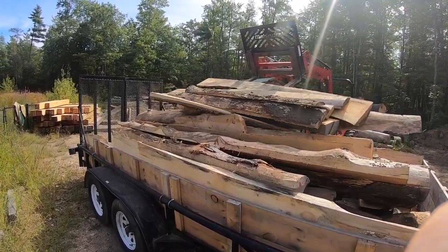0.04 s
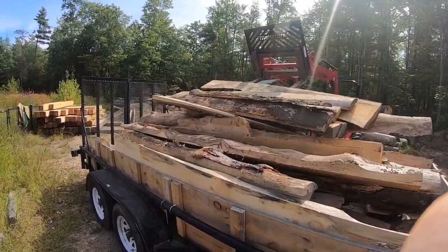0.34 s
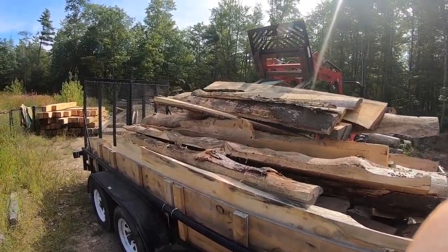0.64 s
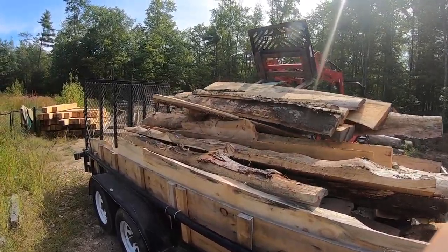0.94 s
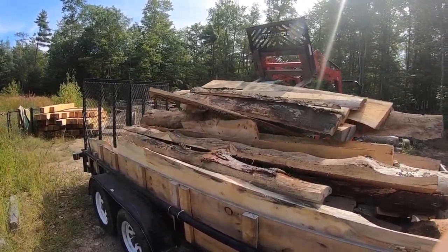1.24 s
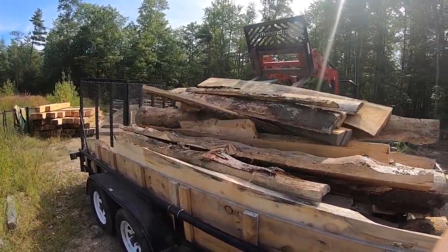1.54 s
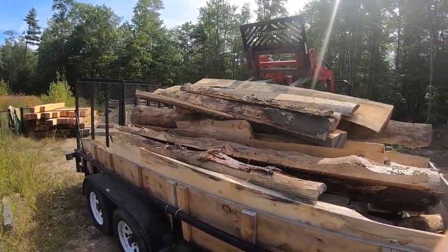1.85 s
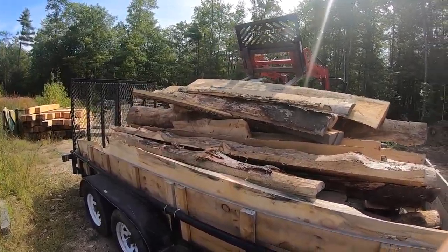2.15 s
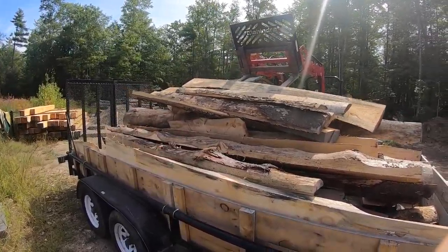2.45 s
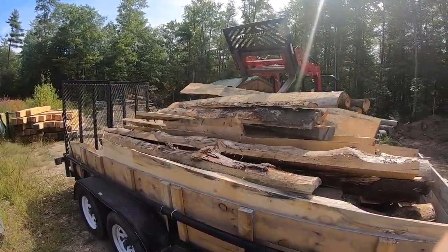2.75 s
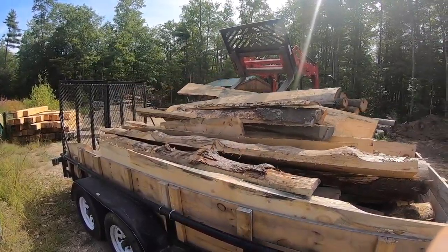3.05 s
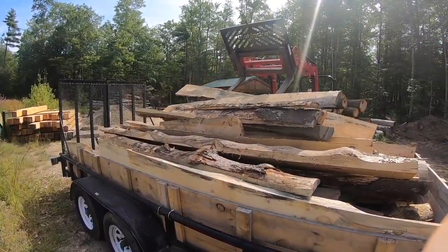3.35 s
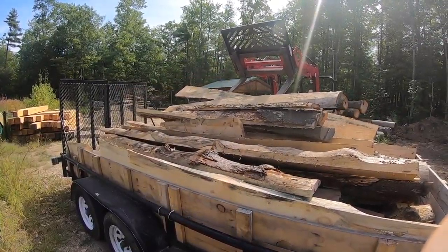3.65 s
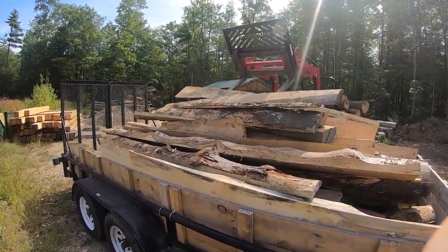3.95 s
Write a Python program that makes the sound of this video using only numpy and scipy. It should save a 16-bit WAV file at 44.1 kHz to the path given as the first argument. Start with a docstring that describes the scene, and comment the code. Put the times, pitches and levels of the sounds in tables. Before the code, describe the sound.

Wood slabs crack and shift over a diesel tractor's steady throb, outdoors a few metres away. Sharp snaps, crumbling bark and light clacks cluster from about 1.1 to 1.8 seconds. Two more cracks come near 2.6 seconds, then the slabs land with a loud hollow knock at 2.75 and settle. From 3.1 seconds the forks scrape softly in short slips, with a faint hydraulic whine at the end. Insects chirp faintly.

```python
"""A bundle of wood slabs is eased onto a trailer load by the forks of a three-cylinder diesel tractor.
Fibres snap and bark crumbles as the weight shifts; then the bundle drops with a hollow knock and
settles, and the forks scrape back. Behind the trailer, the engine's firings throb in the exhaust and
rattle the block. Outdoors, a few metres away, with faint insects and a faint echo from the trees."""
import sys
import numpy as np
from scipy import signal
from scipy.fft import rfft, irfft
from scipy.io import wavfile
from scipy.ndimage import map_coordinates

SR = 44100
rng = np.random.default_rng(int(sys.argv[2]) if len(sys.argv) > 2 else 0)


def master(y):
    """Save y as 16-bit WAV."""
    cut = np.clip(np.atleast_2d(y).T, -1, 1)
    pcm = np.round(cut * 32767)  # scale
    wavfile.write(sys.argv[1], SR, pcm.astype(np.int16))


N = 176400
T, HZ = np.arange(N) / SR, np.arange(N // 2 + 1) * SR / N
CYLINDERS = 3

# how often the engine fires: t/s, rate/Hz
FIRING_RATE = [(0.0, 41.14), (0.25, 41.65), (0.55, 42.25), (0.8, 41.19), (1.0, 40.83), (1.35, 40.85),
               (1.6, 41.08), (1.9, 41.94), (2.15, 42.3), (2.45, 42.07), (2.8, 42.37), (3.1, 42.27),
               (3.45, 42.15), (3.75, 41.36), (4.0, 39.71)]
# how alike the two ears hear clatter, bark and scrapes: f/Hz, likeness (0 to 1)
NOISE_LIKENESS = [(250, 0.99), (560, 0.97), (1200, 0.24), (2500, 0.66), (5200, 0.15), (11000, 0.087)]
# the same for snaps and thuds: f/Hz, likeness (0 to 1)
IMPACT_LIKENESS = [(300, .99), (1000, 0.85), (4000, 0.79), (12000, 0.47)]


def undb(db):
    """Turn decibels into a gain."""
    return 10 ** (np.asarray(db) / 20)


def unit(x):
    """Scale a sound to an average (rms) level of 1."""
    return x / np.sqrt(np.mean(x ** 2))


def pan(db):
    """Gains for two ears, the left one db above the right."""
    return undb(np.array([[.5], [-.5]]) * db)


def by_hz(points):
    """Join points into a curve over pitch."""
    hz, values = np.array(points).T
    return np.interp(np.log(HZ + 1), np.log(hz), values)


def causal(db):
    """A filter with these gains that rings only after it is hit."""
    log_gain = np.log(undb(np.r_[db, db[-2:0:-1]]))
    return np.exp(np.conj(signal.hilbert(log_gain)))[:len(db)]


def colour(x, points, tilt_db=0, pivot_hz=1000):
    """Shape a sound's tone; a tilt, in dB per octave, makes it brighter or duller."""
    octaves = np.clip(np.log2((HZ + 1) / pivot_hz), -1, 2)
    return irfft(rfft(x) * causal(by_hz(points) + tilt_db * octaves), N)


def ears(pair, likeness):
    """Blend two unrelated sounds into left and right of a given likeness."""
    alike = np.clip(by_hz(likeness), 0, 1)
    mid, side = rfft(pair) * np.sqrt([(1 + alike) / 2, (1 - alike) / 2])
    return irfft([mid + side, mid - side], N)


def burst(decay_s):
    """Two unrelated dying noises, each with an energy of 1."""
    x = rng.standard_normal((2, N)) * np.exp(-np.minimum(T / decay_s, 40))
    return x / np.sqrt(np.sum(x ** 2, axis=1, keepdims=True))


def grains(per_s, scatter_db):
    """Two unrelated streams of tiny clicks of uneven size."""
    size = undb(scatter_db * np.minimum(rng.exponential(size=(2, N)), 4))
    return (rng.random((2, N)) < per_s / SR) * rng.choice([-1, 1], (2, N)) * size


def swell(s, length):
    """A smooth rise and fall that peaks at s seconds."""
    return np.exp(-(2 * (T - s) / length) ** 2)


def delay(x, s):
    """The same sound, s seconds later."""
    return np.concatenate([np.zeros(x.shape[:-1] + (int(s * SR),)), x], axis=-1)[..., :N]


def ring(x, response):
    """Give every moment of a sound the same ringing tail."""
    return signal.fftconvolve(x, response, axes=-1)[:, :N]


def insect(calls, hz, db):
    """A thin rasp that swells and fades on each call."""
    band = np.exp(-.5 * ((HZ - hz) / 120) ** 2)
    rasp = unit(irfft(rfft(rng.standard_normal((2, N))) * band, N))
    return undb(db) * rasp * sum(swell(s, length) for s, length in calls)


def insects():
    """Faint insects in the grass: regular pips at first, and scattered higher chirps."""
    # single chirps: t/s, length/s
    chirps = [(.18, .07), (.29, .05), (.5, .04), (.63, 0.057), (.77, 0.076), (1.64, 0.063), (1.89, 0.097),
              (2.16, .1), (2.38, 0.049), (3.43, 0.042), (3.7, 0.061), (3.94, 0.039)]
    pips = [(s, .03) for s in np.arange(.105, 1.25, .134)]
    return insect(pips, hz=7800, db=-57) + insect(chirps, hz=8750, db=-58)


def drone(harmonics, firings):
    """Tones locked to the engine cycle; their levels shift as the speed governor picks up."""
    multiple, early_db, late_db = np.array(harmonics).T
    # these phases make the tones add up to pulses that ring on
    phase = np.angle(causal(np.interp(np.arange(128), multiple, (early_db + late_db) / 2)))
    picked_up = np.interp(T, (1.55, 1.75), (0, 1))
    angle = 2 * np.pi * firings / CYLINDERS
    return sum(undb(early + (late - early) * picked_up) * np.cos(k * angle + phase[k])
               for k, early, late in harmonics)


def exhaust(firings):
    """Firings throb and ring the pipe, each a little different; one weaker cylinder adds a limp."""
    # exhaust tones: multiple of the cycle rate, early level/dB, late level/dB
    harmonics = [(3, -22, -21), (6, -27, -28), (8, -42, -43), (9, -37, -36), (10, -39, -37.5),
                 (11, -39, -38), (12, -27.5, -34), (13, -38.5, -38.5), (14, -50, -47), (15, -31.5, -28),
                 (16, -49, -45), (17, -37, -37), (18, -35.5, -39), (19, -45, -51), (22, -46, -48),
                 (24, -47, -45), (38, -46, -53), (39, -46, -44), (42, -46, -45)]
    on_beat = [row for row in harmonics if row[0] % CYLINDERS == 0]
    off_beat = [row for row in harmonics if row[0] % CYLINDERS]
    throb = drone(on_beat[:3], firings - .9)  # each part lags by a fraction of a firing
    pipe = drone(on_beat[3:], firings - .495)
    limp = drone(off_beat, firings - .605)
    strength = undb(1.1 * np.interp(firings, np.arange(256), rng.standard_normal(256)))
    return undb(2.5) * (throb - strength * (pipe + undb(1) * limp)) * pan(-.6)


def cycle_noise(firings, repeat_share):
    """Noise of which one part comes back with every engine cycle and the rest is new."""
    size = int(SR * CYLINDERS / np.mean(np.array(FIRING_RATE)[:, 1]))
    patterns = irfft(np.exp(2j * np.pi * rng.random((2, size // 2 + 1))), size)
    position = firings / CYLINDERS % 1 * size
    repeated = unit(np.array([map_coordinates(p, [position], mode="grid-wrap") for p in patterns]))
    return np.sqrt(repeat_share) * repeated + np.sqrt(1 - repeat_share) * rng.standard_normal((2, N))


def clatter(firings):
    """Each firing rattles the engine block, one cylinder knocks, and the valves hiss on smoothly."""
    # tone of the rattle, the hiss and the knock: f/Hz, level/dB
    rattle_tone = [(30, -8), (70, 5), (110, 6), (160, 1), (240, 1), (285, -3), (340, 2.5), (410, -1.5),
                   (570, 2), (720, 1.5), (1000, -3), (1300, -5), (1600, -11), (2300, -17), (3200, -17),
                   (5500, -41), (16000, -74)]
    hiss_tone = [(300, -2.5), (1000, 6), (1800, 3.5), (2400, -4.5), (3200, -4), (4200, -9), (5500, -14.5),
                 (6600, -14.5), (8800, -17.5), (10000, -27), (11500, -40), (16000, -49.5)]
    knock_tone = [(200, -25), (400, -9), (560, 1), (750, -2), (1100, -7), (1700, -15), (3200, -21),
                  (5500, -38), (16000, -68)]
    # how hard each cylinder rattles: level/dB
    cylinder_db = (0.85, -0.7, 0.2)
    # which side the clatter is heard on: f/Hz, left minus right/dB
    balance = [(250, 0.16), (560, -5), (1100, -6.5), (3400, -6.5), (6000, -4), (11000, -2)]
    stroke = firings - .58
    cylinder = np.round(stroke).astype(int) % CYLINDERS
    pulse = (1 + .23 * np.cos(2 * np.pi * stroke)) * undb(cylinder_db)[cylinder]
    rattle = unit(colour(cycle_noise(firings, repeat_share=.57) * pulse, rattle_tone))
    hiss = unit(colour(rng.standard_normal((2, N)), hiss_tone))
    since_knock = (firings - .24) % CYLINDERS
    knock = unit(colour(np.exp(-since_knock / .28) * rng.standard_normal((2, N)), knock_tone))
    mix = ears(undb(-33.5) * rattle + undb(-40) * hiss + undb(-44) * knock, NOISE_LIKENESS)
    return irfft(rfft(mix) * pan(by_hz(balance)), N)


def pump_whine(firings):
    """The hydraulic pump whines as it takes load."""
    # whine tones: multiple of the firing rate, level/dB, start/s, fully on/s
    tones = [(34.4, -42.5, 3.82, 3.86), (45.2, -43, 3.84, 3.94)]
    return pan(-6) * sum(undb(db) * np.interp(T, (start, full), (0, 1)) * np.sin(2 * np.pi * k * firings)
                         for k, db, start, full in tones)


def tractor():
    """Exhaust, clatter and pump whine all follow one engine speed."""
    # the level as heard, which dips briefly after the loud knock and recovers: t/s, level/dB
    heard_level = [(0, 3.5), (.15, 0), (1.5, 1), (2.4, 0.8), (2.8, 0.5), (3.06, -2), (3.4, -0.54), (4, 0.3)]
    firings = .46 + np.cumsum(np.interp(T, *np.array(FIRING_RATE).T)) / SR  # running count
    engine = exhaust(firings) + clatter(firings) + pump_whine(firings)
    return engine * undb(np.interp(T, *np.array(heard_level).T))


def rubbing(tone):
    """The gritty noise of rough wood: thousands of tiny clicks a second."""
    return unit(colour(ears(grains(per_s=2300, scatter_db=-1), NOISE_LIKENESS), tone))


def fork_scrapes():
    """The forks slide back along the slabs in short, dry slips."""
    # slips of the forks: t/s, length/s, level/dB
    slips = [(3.138, 0.088, -41), (3.455, 0.056, -40.5), (3.59, .07, -44), (3.685, .05, -43),
             (3.822, .05, -48), (3.93, .045, -40)]
    # tone of a scrape: f/Hz, level/dB
    tone = [(400, -18), (1000, 1), (1600, 1), (2400, -5), (2950, 2), (3600, -6), (5500, -24), (16000, -55)]
    return rubbing(tone) * sum(undb(db) * swell(s, length) for s, length, db in slips) * pan(-4)


def crumbling_bark():
    """Bark crumbles under a sliding slab, swelling fast and dying away with each slip."""
    # slips of the slabs: t/s, length/s, level/dB
    slips = [(0.001, .1, -43), (1.093, 0.06, -39), (1.3, 0.046, -43), (1.403, 0.074, -38),
             (1.452, 0.14, -36.5), (1.55, 0.31, -49), (2.606, 0.12, -44.5), (2.817, 0.048, -36.5),
             (2.854, 0.19, -50)]
    # tone of the bark: f/Hz, level/dB
    tone = [(300, -12), (1500, 4), (3200, 8), (5000, -2.5), (7000, 0.5), (10000, -5), (12000, -16.5),
            (16000, -33)]
    stages, shape = np.array([0, .11, .44, 1]), (0, 1, .75, .013)
    loudness = sum(undb(db) * np.interp(T, s + length * stages, shape) for s, length, db in slips)
    return loudness * rubbing(tone) * pan(-3)


def snapping_fibres():
    """Sharp breaks spray splinters and tear small fibres; the sound bounces off the ground and rings in the
    load."""
    # breaks: t/s, level/dB, fade time/s, tilt/(dB per octave), left minus right/dB
    breaks = [(1.0985, -13.5, 0.0022, -2.5, -5), (1.3214, 0, 0.0012, -0.5, -1.5), (1.399, -27, .001, 6, -3),
              (1.413, -16, 0.0022, -7, -3), (1.4237, -11, 0.0023, -7, -1), (1.4564, -3, 0.00093, -1.5, -.5),
              (1.4583, -2, 0.0017, -8, 2), (1.465, -16, .0015, 1, 0), (1.481, -14, .003, -1, 0),
              (1.5082, -11.5, 0.0023, 6, 6), (1.5111, -0.5, 0.0027, 3, -4), (1.514, -4, 0.0032, -7, 5),
              (1.522, -9, 0.0039, -3, 0), (1.596, -10.5, 0.0035, -9.5, 1), (1.5998, -7.5, 0.0041, -10, -3),
              (1.713, -8.5, 0.016, -9, -9.5), (1.83, -20, .0005, 1, -2), (2.573, -7, 0.0017, -9, -6),
              (2.5753, 4.5, 0.0011, -2, -0.5), (2.582, -18, .002, 1, 1), (2.6155, -14, .002, -2, -2),
              (2.6261, 1, 0.0019, -2.5, -1), (2.631, -4.5, 0.0038, -10, -1.5),
              (2.827, -8.5, 0.012, -8.5, -5), (2.95, -13, 0.018, -3, -4), (3.162, -18, 0.0023, 2.5, 0)]
    # tone of a snap: f/Hz, level/dB
    tone = [(100, -30), (600, -19), (1100, -8), (1700, -1.5), (2300, -1.5), (2850, 2.5), (3400, 0),
            (3900, 1.5), (4700, -5), (5450, -10), (6400, -1), (8000, -12), (9400, -9.5), (10500, -19),
            (12000, -29), (16000, -39)]
    snaps = np.zeros((2, N))
    for s, db, decay_s, tilt_db, pan_db in breaks:
        fibres = grains(per_s=700, scatter_db=2.5) * np.exp(-np.minimum(T / .01, 20))
        fibres /= np.sqrt(np.sum(fibres ** 2) / 2)
        snap = ears(undb(-2.5) * burst(decay_s) + undb(-11) * fibres, IMPACT_LIKENESS)
        snap[:, 0] -= np.exp(-decay_s / .0019)  # a quicker break starts with a harder click
        snaps += delay(colour(snap, tone, tilt_db, pivot_hz=2780), s) * undb(10 + db) * pan(pan_db)
    bounce = undb(-16) * delay(snaps, .0061)
    return snaps + bounce + undb(-10.5) * ring(snaps, burst(decay_s=.011))


def board(tones, tilt_db=0, pitch=1):
    """A struck board rings with several fading tones, tuned a little differently on each blow."""
    tunings = pitch * (1 + .015 * rng.standard_normal(len(tones)))
    sound = np.zeros(N)
    for k, ((hz, db, ring_s), tuning) in enumerate(zip(tones, tunings)):
        fade = undb(db + tilt_db * np.log2(hz / 250) - 60 * np.minimum(T / ring_s, 2))
        sound += (-1) ** k * fade * np.sin(2 * np.pi * hz * tuning * T)
    return sound


def board_clacks():
    """Light boards clack against each other."""
    # clacks: t/s, level/dB
    hits = [(1.514, -25), (1.596, -33), (1.5988, -20), (1.612, -30), (1.714, -29), (1.721, -26.5)]
    # ring of a light board: f/Hz, level/dB, time to fade by 60 dB/s
    tones = [(710, -10.5, 0.048), (1090, 1, 0.04), (1210, 1, 0.045), (1340, -9, 0.027), (2160, -8, 0.03)]
    return sum(undb(db) * delay(board(tones), s) for s, db in hits) * pan(-4)


def landing_slabs():
    """Heavy slabs land and bounce with a rough thud, a hollow ring and a rumble in the load."""
    # blows: t/s, level/dB, tilt/(dB per octave), pitch ratio
    blows = [(.001, -12, 2, 1.15), (2.7485, 0.5, -0.5, 0.95), (2.752, .5, 0, 0.99), (2.758, -1, 2, 0.99),
             (2.767, -6, 0.5, .95), (2.782, -1, -7.5, .93), (2.803, -5.5, -7.5, 1.1),
             (2.8246, -1, -2.5, 1.04), (2.852, -5.5, -2, .92), (2.89, -7, -4, 1.1),
             (2.931, -8.5, -3.5, 0.98), (2.946, -5, -7, 1.06), (2.976, -5.5, -9.5, 0.87)]
    # ring of a slab: f/Hz, level/dB, time to fade by 60 dB/s
    tones = [(134, -2, 0.19), (176, -0.5, 0.24), (220, 0.5, 0.13), (292.5, -2, 0.16), (358, 0.5, 0.13),
             (471, -0.5, 0.12), (540, -3.5, .1), (615, -7, 0.11), (686, -4, 0.085), (930, -9, 0.054),
             (1044, -5, 0.071), (1140, -3.5, 0.061), (1295, -12, .068), (1663, -12, 0.074)]
    # tone of the thud and of the rumble after it: f/Hz, level/dB
    thud_tone = [(50, -29), (140, -4), (290, -6), (420, -1), (700, -1), (1100, -3.5), (1600, -11),
                 (3400, -24), (5000, -37), (16000, -74)]
    rumble_tone = [(50, -19), (120, -1), (200, 2.5), (330, -5.5), (600, -19), (1500, -32.5), (16000, -72)]
    knocks = np.zeros((2, N))
    for s, db, tilt_db, pitch in blows:
        thud = colour(ears(burst(decay_s=.0049), IMPACT_LIKENESS), thud_tone, tilt_db, pivot_hz=248)
        rumble = colour(burst(decay_s=.038)[0], rumble_tone)
        hollow = board(tones, tilt_db, pitch)
        knocks += undb(db) * delay(undb(-21) * hollow + undb(19.5) * thud + undb(29.5) * rumble, s)
    return knocks


def scene():
    """The wood and its echo from the trees, over faint insects and the tractor."""
    wood = snapping_fibres() + crumbling_bark() + landing_slabs() + board_clacks() + fork_scrapes()
    background = insects() + tractor()
    tree_echo = undb(-18) * ring(wood, delay(burst(decay_s=.048), .012))
    return background + wood + tree_echo


def record(dry):
    """The microphone cuts the highest treble."""
    return signal.sosfilt(signal.ellip(8, .2, 70, 15800, fs=SR, output="sos"), dry)


dry = scene()
out = record(dry)
master(out)
```